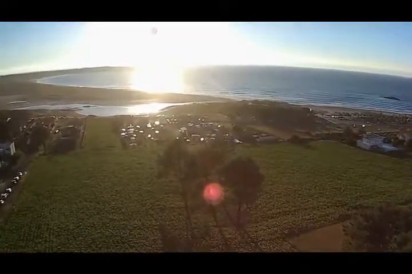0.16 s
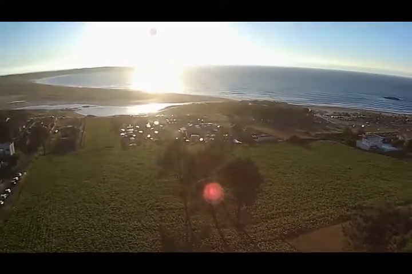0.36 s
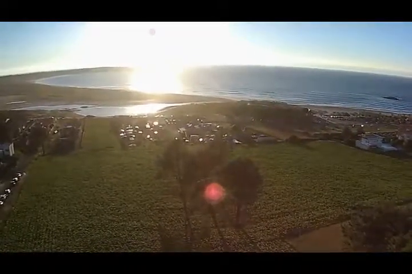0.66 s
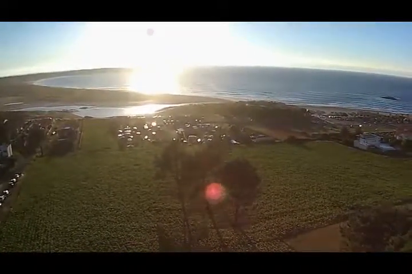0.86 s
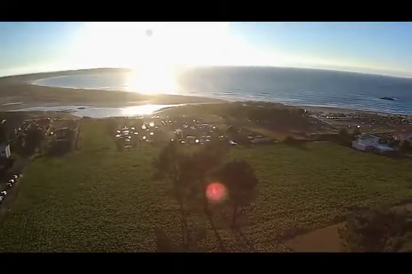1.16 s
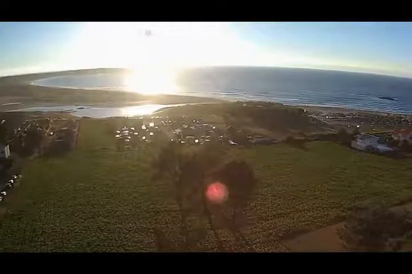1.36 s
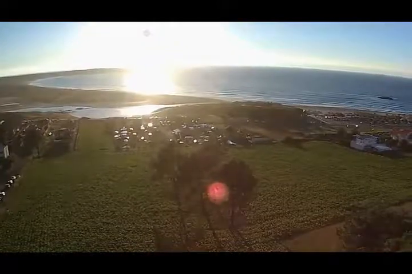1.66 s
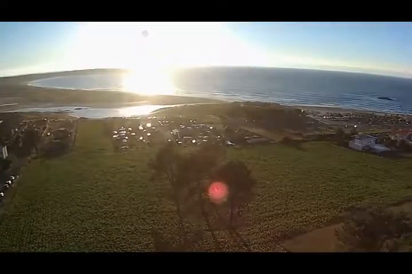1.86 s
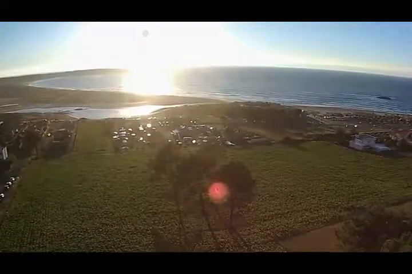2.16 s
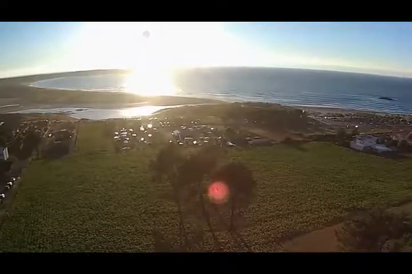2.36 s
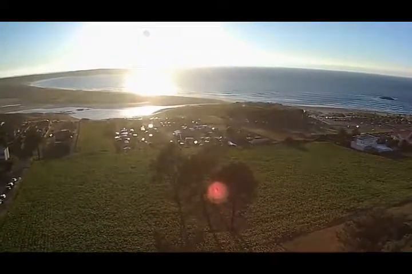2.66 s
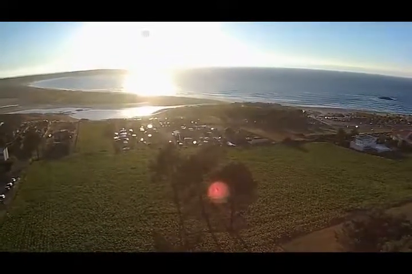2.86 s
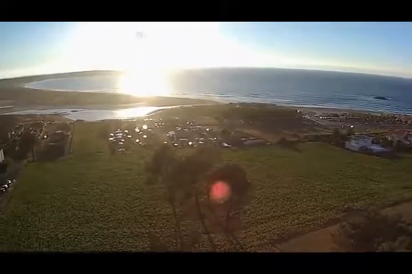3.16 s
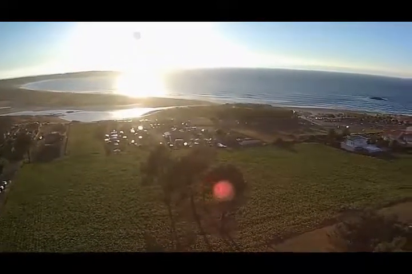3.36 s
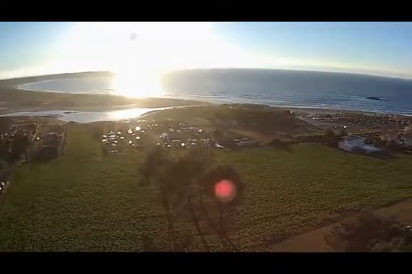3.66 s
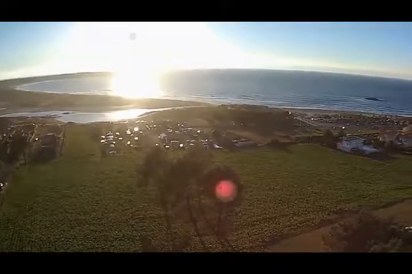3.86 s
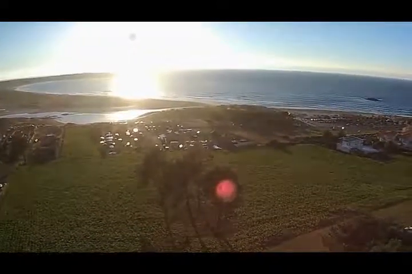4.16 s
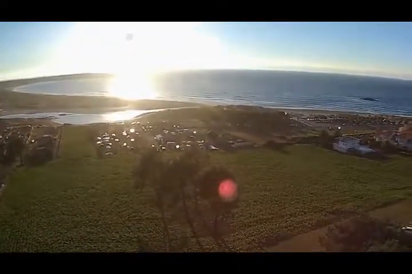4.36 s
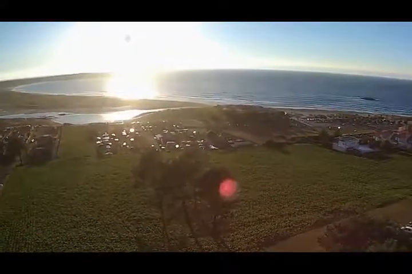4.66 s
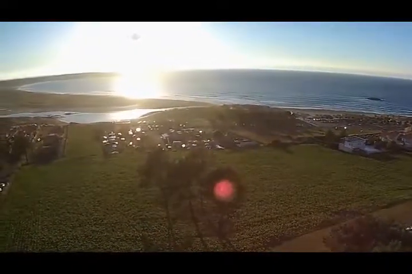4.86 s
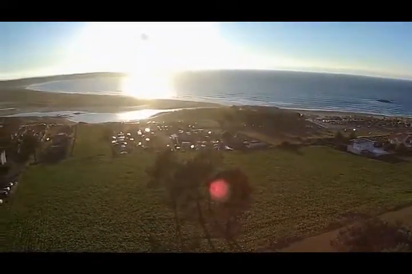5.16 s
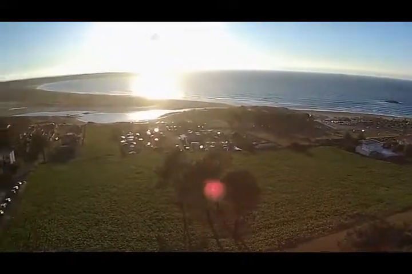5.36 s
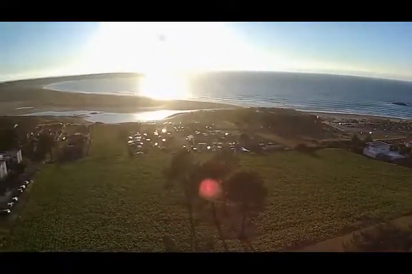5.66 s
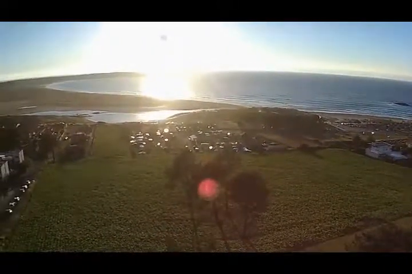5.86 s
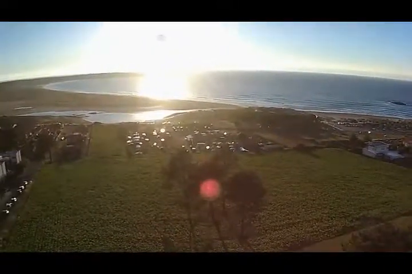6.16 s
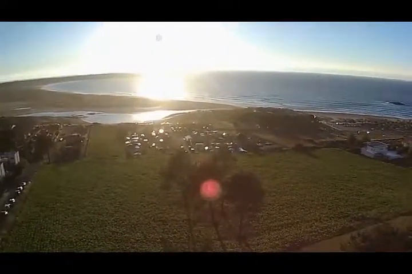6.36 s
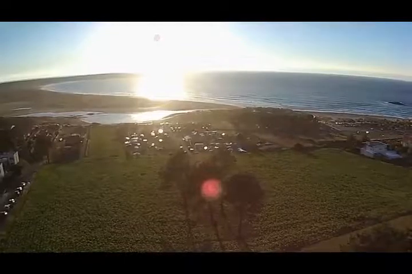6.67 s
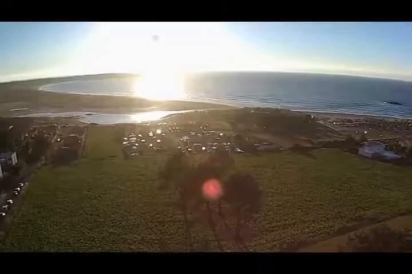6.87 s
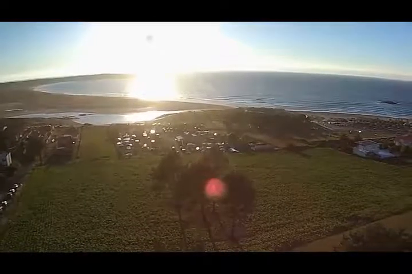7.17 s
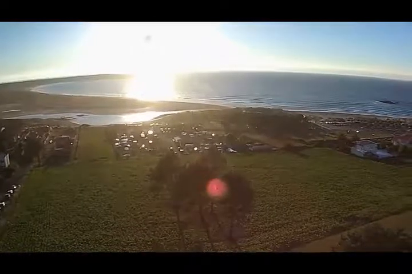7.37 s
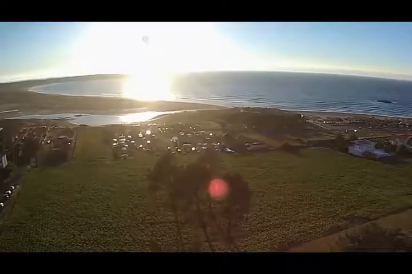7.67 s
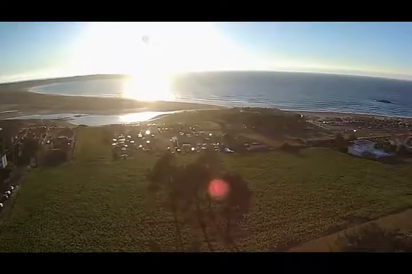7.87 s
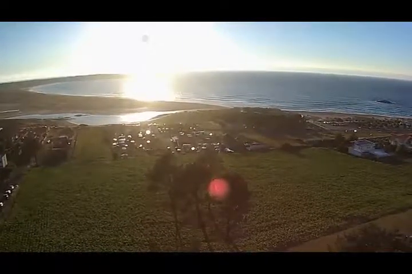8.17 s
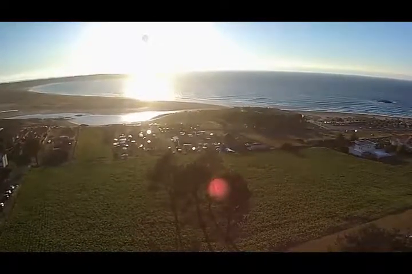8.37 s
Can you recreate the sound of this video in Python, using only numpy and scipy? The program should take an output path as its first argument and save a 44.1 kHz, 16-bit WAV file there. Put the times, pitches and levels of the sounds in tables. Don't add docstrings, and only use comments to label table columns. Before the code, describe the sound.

A small multirotor hovers outdoors, heard from a microphone enclosed on its own frame. A loud, compressed, boxy midrange roar of propeller wash runs throughout, chopped into a rough flutter, with two slightly detuned buzzing rotor tones beating inside it. Surges come quickly, the load grows in the middle and then eases. Thin hiss, faint whistles and tiny ticks sit on top.

```python
import sys
import numpy as np
from scipy import signal
from scipy.fft import rfft, irfft, next_fast_len
from scipy.io import wavfile
from scipy.ndimage import uniform_filter1d

SR = 44100
rng = np.random.default_rng(int(sys.argv[2]) if len(sys.argv) > 2 else 0)


def how_loud(loudness_db):
    steps = np.asarray(loudness_db, float) / 20
    return 10 ** steps


def pcm_store(signal):
    levels = np.round(np.clip(np.atleast_2d(signal), -1, 1) * 32767)
    wavfile.write(sys.argv[1], SR, levels.astype(np.int16).T)


N = 375732
CASE_HZ = 1405.0


def rms_one(x):
    return x / np.sqrt(np.mean(x ** 2) + 1e-20)


def drift(rate_hz):
    pole = np.exp(-40 * np.pi * rate_hz / SR)
    noise = rng.standard_normal(N // 20 + 2002)
    slow = signal.lfilter([1], [1, -2 * pole, pole * pole], noise)[2000:]
    return np.interp(np.arange(N) / 20, np.arange(len(slow)), rms_one(slow))


def filtered(x, gain_at):
    size = next_fast_len(N)
    hz = np.arange(size // 2 + 1) * SR / size + 1e-3
    return irfft(rfft(x, size) * gain_at(hz), size)[:N]


def coloured(spectrum, fall_db):
    hz, db = np.transpose(spectrum)

    def gain_at(f):
        outside_hz = np.maximum(f - hz[-1], 0) + np.maximum(hz[0] - f, 0)
        return how_loud(np.interp(np.log(f), np.log(hz), db) - fall_db * outside_hz / 1000)
    return gain_at


def bump(s, db, half_s):
    return db * np.exp(-((np.arange(N) / SR - s) / half_s) ** 2)


# t/s, nearer blade rate f/Hz, farther blade rate f/Hz, wash load level/dB, nearer blade bite level/dB
FLIGHT = [(0.0, 203.7, 211.5, -.5, 1.5), (0.5, 200.6, 211.9, 0, -1), (1.05, 197.6, 214.8, -1, 2.5),
          (1.5, 200.5, 215.8, -0.5, 2), (1.95, 196.9, 216.5, 0, 0), (2.2, 200.2, 217.8, -1.5, 1.5),
          (2.7, 199.6, 217.6, -0.5, -2), (3.0, 195.4, 217.6, 1, -15), (3.45, 191.4, 220.9, 2.5, 0),
          (3.9, 191.9, 221.1, 1, 1), (4.7, 191.4, 220.8, 3, 1), (5.1, 198.3, 213.5, -0.5, 0),
          (5.6, 209.7, 210.7, 0, 0), (6.3, 209.3, 209.4, 0, -0.5), (6.8, 204.5, 210.3, -1.5, 0.5),
          (7.1, 199.4, 212.4, 0, 1.5), (7.7, 201.3, 216.6, -1, 0), (8.52, 199.6, 216.2, -1, 2)]


def flight():
    s, *columns = np.transpose(FLIGHT)
    return [np.interp(np.arange(N) / SR, s, column) for column in columns]


# f/Hz, level/dB per Hz
HISS = [(5800, -32.5), (6250, -17), (6650, -9.5), (7200, -11), (7700, -18), (8500, -21.5), (8800, -15),
        (9500, -7), (10400, -6.5), (10900, 0), (11400, -0.5), (12300, -7.5), (13500, -11), (15600, -11)]


def hiss():
    air = rms_one(filtered(rng.standard_normal(N), coloured(HISS, fall_db=43)))
    return air * how_loud(-48 + 0.3 * drift(6.0) + 0.4 * drift(40))


# f/Hz, bandwidth/Hz, level/dB
WHISTLES = [
    (8090, 25, -72),
    (8240, 50, -78),
    (8705, 40, -69),
    (8920, 60, -71),
]


def whistles():
    out = 0
    for hz, width_hz, db in WHISTLES:
        noise = rng.standard_normal(N)
        band = filtered(noise, lambda f: 1 / (1 + (2 * (f - hz) / width_hz) ** 2))
        out = out + how_loud(db) * rms_one(band)
    return out


# t/s, peak level/dB
TICKS = [(0.7877, -39), (0.8705, -41.5), (1.1044, -36), (1.7076, -46), (1.8293, -41), (1.8737, -40.5),
         (2.5661, -35.5), (2.6379, -46), (2.8619, -39), (2.9996, -44), (3.274, -40), (3.3867, -44.5),
         (3.5309, -39), (3.6157, -43), (3.702, -37), (3.9739, -36), (4.0043, -44.5), (4.0288, -41),
         (4.0797, -47), (4.1016, -42.5), (4.2907, -42.5), (4.3426, -41), (4.363, -45), (4.825, -41),
         (5.0839, -38), (5.235, -43), (6.6129, -42.5), (7.1831, -44.5), (8.0551, -39), (8.3949, -43.5)]


def ticks():
    load_db = flight()[2]
    ticks_per_s = 12 * how_loud(3.0 * load_db)
    born = rng.random(N) < ticks_per_s / SR
    clicks = born * how_loud(-27 + 3.0 * rng.standard_normal(N))
    places = [round(s * SR) for s, db in TICKS]
    clicks[places] = how_loud(np.array(TICKS)[:, 1] + 20)
    bright = signal.butter(8, [11000, 15500], "band", fs=SR, output="sos")
    return signal.sosfilt(bright, clicks)


# t/s, level/dB
SURGES = [(.31, 3), (.72, 3), (1.11, 1.5), (1.23, 3.5), (1.59, 3), (1.69, 2.5), (1.89, 3.5), (1.99, 0),
          (2.11, 2), (2.72, 1), (2.35, 6), (2.47, 4), (2.57, 4.5), (2.86, 4.5), (2.96, 6.5), (3.02, 3.5),
          (4.37, 2.5), (4.82, 3.5), (5.8, 0.5), (6.44, 3), (7.0, 3), (7.19, 2.5), (7.43, 1.5), (7.7, 2.5),
          (7.82, 2.5), (7.95, 4), (8.07, 5.5), (8.19, 5), (8.28, 1.5), (8.43, 3)]


def buffeting():
    return sum(bump(s, db, half_s=0.023) - bump(s, 0.26 * db, half_s=0.074) for s, db in SURGES)


# f/Hz, level/dB per Hz
ROAR = [(15, -43.5), (22, -23), (150, -21), (300, -20), (530, -18), (900, -14), (1200, -4.5), (1450, -3),
        (2000, -4), (2750, -5), (3200, -14), (4000, -26.5), (4700, -30.5), (5500, -41)]


def wash(near, far):
    load_db = flight()[2]
    white = filtered(rng.standard_normal(N), coloured(ROAR, fall_db=28.5))
    white = filtered(white, lambda f: 1 + how_loud(-1.5) / (1 + ((f - CASE_HZ) / 22) ** 2))
    white /= np.std(filtered(white, lambda f: (f > 900) & (f < 3500)))
    chop = 0.11 * np.sin(near) + 0.18 * np.sin(near / 2)
    chop += 0.15 * np.sin(far) + 0.066 * np.sin(0.62 * near)
    buffet_db = buffeting()
    edges_hz = [0, 120, 250, 500, 850, 1250, 1750, 2150, 2600, 3200, 9000]
    out = 0
    for low, high in zip(edges_hz, edges_hz[1:]):
        band = filtered(white, lambda f: (f >= low) & (f < high))
        if high <= 850:
            gust_db = (low > 200) * bump(4.34, 4.8, half_s=0.29)
            gain = how_loud(-12 + 0.3 * load_db + gust_db + 0.42 * drift(3.3))
        elif high <= 1750:
            gain = how_loud(-12 + 0.13 * load_db + 0.38 * buffet_db + 1.04 * drift(25.0)) * (1 + 0.6 * chop)
        elif high <= 2150:
            gain = how_loud(-12.5 + 0.3 * load_db + 0.3 * buffet_db + 0.78 * drift(6.6)) * (1 + chop)
        elif high <= 3200:
            gain = how_loud(-13.5 + 1.18 * load_db + 1.44 * buffet_db + 2.23 * drift(41.0)) * (1 + chop)
        else:
            gain = how_loud(-11 + 0.26 * load_db + 0.3 * buffet_db + 0.98 * drift(16.0)) * (1 + 0.37 * chop)
        out = out + gain * band
    return out


def turning(rate_hz, jitter_hz):
    return 2 * np.pi * np.cumsum(rate_hz + jitter_hz * drift(8.61)) / SR


def tone(phase, level_db, wobble_db):
    scatter_rad = 0.56 * drift(9.8) + rng.uniform(0, 2 * np.pi)
    return np.sqrt(2) * how_loud(level_db + wobble_db * drift(9.8)) * np.sin(phase + scatter_rad)


# t/s, level/dB, half width t/s
WHINE_SWELLS = [(.05, 8.5, .15), (.75, 7, 0.1), (2.25, 8.5, 0.27), (2.75, -2.5, .1), (5.35, 5, 0.084),
                (5.7, 8.5, 0.098), (6.87, 10, .12), (7.25, 5.5, .08), (7.55, 6, 0.17), (7.87, 7, .1),
                (8.2, 2, .15)]


def whine(near, far, rate_hz):
    off_resonance = (7 * rate_hz - CASE_HZ) / 53.0
    level_db = -29 - np.minimum(off_resonance ** 2, 12.0)
    level_db = level_db + sum(bump(*swell) for swell in WHINE_SWELLS)
    beat = 1 + 0.45 * np.sin((far - near) / 2)
    return beat * tone(7 * near, level_db, wobble_db=1.8)


# multiple of blade rate, relative level/dB, wobble level/dB
OVERTONES = [
    (2, -4.5, 1.5),
    (3, -0.8, 3),
    (4, 2, 2.5),
    (5, 5, 2),
    (6, 3, 4),
    (8, 2, 5.5),
    (10, 9.5, -2.5),
]


def rotors(near, far):
    rate_hz, far_hz, load_db, bite_db = flight()
    gap_hz = far_hz - rate_hz
    out = tone(far, -36 - 0.28 * gap_hz, wobble_db=1.0)
    out += tone(2 * far, -46.0, wobble_db=-1.0)
    out += tone(near, -52 + 0.34 * gap_hz, wobble_db=3.0)
    shaft_db = -55 + bump(8.27, 17, half_s=0.35)
    out += tone(near / 2, shaft_db, wobble_db=3.5)
    out += whine(near, far, rate_hz)
    overtone_db = -36 - 0.14 * gap_hz + bite_db
    for multiple, db, wobble_db in OVERTONES:
        out += tone(multiple * near, overtone_db + db, wobble_db)
    return out


def scene():
    near_hz, far_hz, load_db, bite_db = flight()
    near = turning(near_hz, jitter_hz=1.267 * how_loud(load_db))
    far = turning(far_hz, jitter_hz=0.76)
    return (hiss() + whistles() + wash(near, far) + rotors(near, far))[None]


def limiter(x, top, knee, smooth_s):
    width = max(int(smooth_s * SR), 1)
    envelope = np.abs(signal.hilbert(x, next_fast_len(N))[:N])
    gain = (1 + (envelope / top) ** knee) ** (-1 / knee)
    return x * uniform_filter1d(uniform_filter1d(gain, width), width)


# f/Hz, width/Hz, depth level/dB
NOTCHES = [
    (6170, 68, -4),
    (7960, 90, -27),
    (8340, 50, -14.5),
]


def case_cancellations(x):
    def gain_at(f):
        return how_loud(sum(db * np.exp(-((f - hz) / width_hz) ** 2) for hz, width_hz, db in NOTCHES))
    return filtered(x, gain_at)


# f/Hz, share of lines dropped (0-1)
HOLES = [(5300, .04), (5800, .5), (6250, .85), (6900, .3), (7550, .62), (7900, .95), (8400, .85),
         (8800, .35), (10500, .33), (11000, .08), (11800, .2), (12300, .45), (14000, .52), (15700, .68)]


def thinned_treble(x):
    frame, offset = 1024, 456
    bins = np.arange(200, 744)
    n = np.arange(2 * frame) + 0.5
    window = signal.windows.kaiser_bessel_derived(2 * frame, 4 * np.pi)
    basis = window * np.cos(np.pi / frame * np.outer(bins + 0.5, n + frame / 2))
    padded = np.pad(x, (2 * frame - offset, 3 * frame))
    halves = padded[:len(padded) // frame * frame].reshape(-1, frame)
    lines = np.hstack([halves[:-1], halves[1:]]) @ basis.T
    step = how_loud(-3) * np.sqrt(uniform_filter1d(np.mean(lines ** 2, axis=0), size=16))
    clumps = uniform_filter1d(rng.standard_normal(lines.shape), size=3, axis=0)
    clumps = uniform_filter1d(clumps, size=6, axis=1)
    share = np.interp((bins + 0.5) * SR / 2 / frame, *np.transpose(HOLES))
    kept = rms_one(clumps) > np.log(share / (1 - share)) / 1.7
    kept |= np.abs(lines) > 3.5 * step
    rounded = kept * np.sign(lines) * np.floor(np.abs(lines) / step + 0.42) * step
    error = (rounded - lines) @ basis * 2 / frame
    halves[:-1] += error[:, :frame]
    halves[1:] += error[:, frame:]
    return halves.ravel()[2 * frame - offset:][:N]


def low_pass(x):
    return signal.sosfilt(signal.butter(12, 15720, fs=SR, output="sos"), x)


def record(dry):
    limited = limiter(how_loud(0.27) * dry[0], top=0.82, knee=7.2, smooth_s=0.0002)
    mix = thinned_treble(case_cancellations(limited)) + ticks()
    return low_pass(mix[None])


dry = scene()
out = record(dry)
pcm_store(out)
```